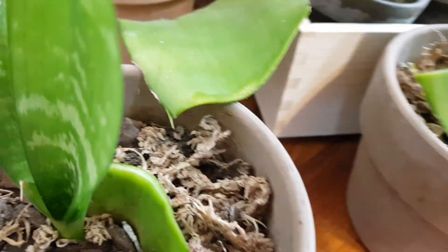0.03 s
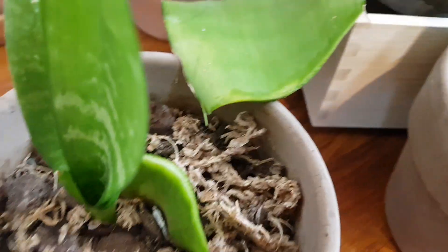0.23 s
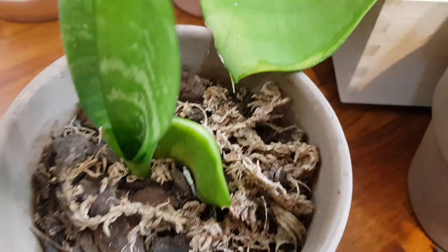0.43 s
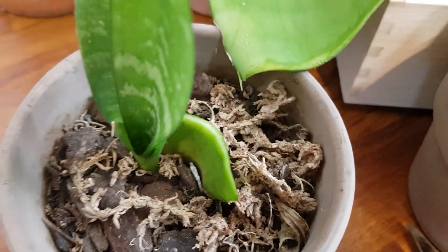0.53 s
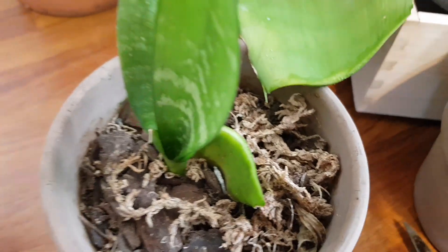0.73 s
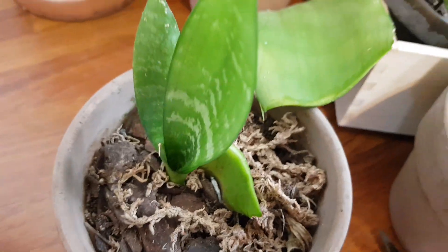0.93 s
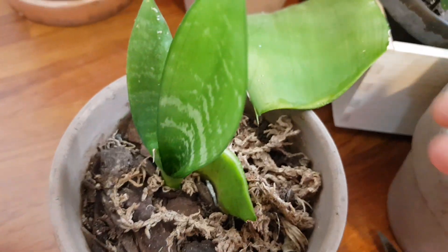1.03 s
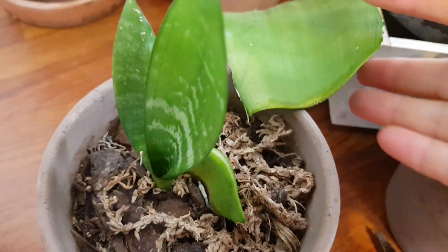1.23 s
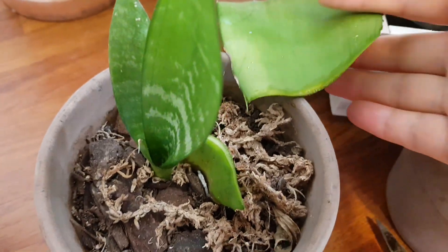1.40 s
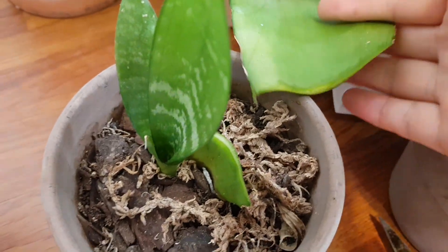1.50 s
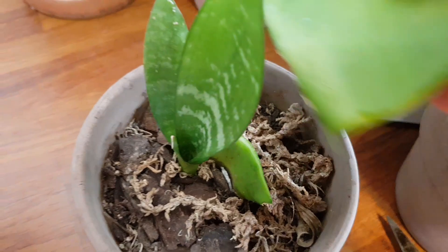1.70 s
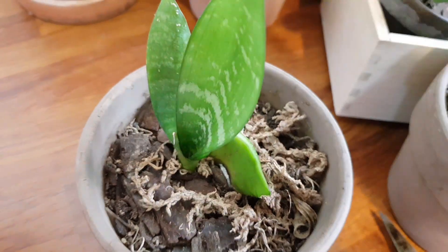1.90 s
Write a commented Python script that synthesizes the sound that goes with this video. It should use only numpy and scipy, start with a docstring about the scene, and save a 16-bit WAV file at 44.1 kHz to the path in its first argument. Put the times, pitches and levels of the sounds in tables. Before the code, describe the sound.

Close up, a clay pot slides on wood in two short, gritty, squeaking scrapes, ending in a bright clatter against a neighbouring pot. Later a finger softly brushes a leaf, over a small room's low appliance hum.

```python
"""Over a low appliance hum, a clay plant pot jolts and scrapes across a wooden table in a small room.
Sand catches under its foot, which sticks and slips in a hoarse squeak and a lower groan.
The pot rocks and knocks against its neighbour: each hit thumps the table and makes the clay ring.
Then a finger softly taps a leaf and slides along it."""
import sys
import numpy as np
from scipy import signal
from scipy.fft import rfft, irfft, next_fast_len
from scipy.io import wavfile
from scipy.ndimage import uniform_filter1d, map_coordinates

SR = 44100
rng = np.random.default_rng(int(sys.argv[2]) if len(sys.argv) > 2 else 0)


def dump(signal):
    """Clip the signal to [-1, 1] and save it as 16-bit WAV at the path in sys.argv[1]."""
    limited = np.clip(np.atleast_2d(signal).T, -1, 1)
    pcm = np.round(limited * 32767).astype(np.int16)
    wavfile.write(sys.argv[1], SR, pcm)


N = 85995
TIME_S = np.arange(N) / SR


def amp(db):
    """Turn decibels into a gain to multiply by."""
    return 10 ** (np.asarray(db) / 20)


def unit(x):
    """Scale a signal to an average (rms) level of 1."""
    return x / np.sqrt(np.mean(x ** 2) + 1e-20)


def along(points, hz):
    """Read between (frequency_hz, value) points on a log frequency axis."""
    points_hz, values = np.transpose(points)
    return np.interp(np.log(hz + 1), np.log(points_hz + 1), values)


def level(points):
    """A gain for each sample from (time_s, level_db) points, silent outside them."""
    return amp(np.interp(TIME_S, *np.transpose(points), left=-150, right=-150))


def wobble(rate_hz):
    """A smooth curve through rate_hz random values a second."""
    return map_coordinates(rng.standard_normal(2048), [TIME_S * rate_hz], mode="wrap")


def fade(t, decay_s, attack_s=.0002):
    """A sharp start that dies away by 60 dB in decay_s."""
    return np.exp(-np.log(1000) * t / decay_s) * (1 - np.exp(-t / attack_s))


def filtered(x, response):
    """Give each frequency in x the gain that response sets for it."""
    size = next_fast_len(N + SR // 4)
    return irfft(rfft(x, size) * response(np.fft.rfftfreq(size, 1 / SR)), size)[..., :N]


def colour(points):
    """A filter shape through (frequency_hz, level_db) points."""
    return lambda f: amp(along(points, f))


def resonances(rows):
    """A filter shape with a steep peak for each (pitch_hz, width_hz, level_db) row."""
    return lambda f: sum(amp(db) * np.abs(f * width / (hz * hz - f * f + 1j * f * width)) ** 2
                         for hz, width, db in rows)


# How alike left and right are (1 = the same): frequency_hz, likeness
STEREO_LIKENESS = [(90, 0.96), (250, .85), (600, 0.52), (1500, 0.05)]
def noise(response, lag_ms=0):
    """Filtered stereo noise at level 1, nearly mono in the bass; the left side is lag_ms late."""
    def split(f):
        angle = np.arccos(np.clip(along(STEREO_LIKENESS, f), -1, 1)) / 2
        return response(f) * np.array([np.cos(angle), np.sin(angle)])
    mid, side = filtered(rng.standard_normal((2, N)), split)
    left = np.roll(mid + side, int(lag_ms * SR / 1000))
    return unit(np.array([left, mid - side]))


# The motor's tones: multiple of its pitch, level_db
HUM_TONES = [(3, -66), (5, -57), (6, -62), (8, -72), (10, -77.5)]
# The colour of the room's rumble: frequency_hz, level_db
RUMBLE_COLOUR = [(25, -10.5), (42, -10), (150, -7.5), (400, -19.5), (650, -28), (1200, -40.5), (3200, -48),
                 (5800, -43), (8000, -50), (12000, -44)]
def background(hum_hz=59.1, waver_hz=.18, whine_hz=9150):
    """An appliance motor's wavering hum, with room rumble and a faint high whine."""
    phase = 2 * np.pi * np.cumsum(hum_hz + waver_hz * wobble(25)) / SR
    hum = np.sqrt(2) * sum(amp(db) * np.sin(multiple * phase + rng.uniform(0, 2 * np.pi))
                           for multiple, db in HUM_TONES)
    whine = noise(lambda f: np.exp(-((f - whine_hz) / 110) ** 2))
    rumble = noise(colour(RUMBLE_COLOUR))
    return hum + amp(-55) * rumble + amp(-85.5) * whine


# How long the echo's tail lasts: frequency_hz, decay_s
ECHO_DECAY = [(100, 0.37), (2000, .41), (6500, 0.19), (14000, 0.18)]
# The echo's strength next to the direct sound: frequency_hz, level_db
ECHO_COLOUR = [(100, -11), (2000, -17.5), (14000, -14.5)]
def room_echo(x, build_s=.0033, early_s=.31, early_db=8):
    """The nearest walls answer with a quick wash, over a light tail that dies faster in the treble."""
    hz, t, spectrum = signal.stft(noise(np.ones_like)[:, :SR // 2], SR, nperseg=256)
    decay = fade(t, along(ECHO_DECAY, hz)[:, None]) + amp(early_db) * fade(t, early_s)
    build_up = 1 - np.exp(-t / build_s)
    click_echo = signal.istft(spectrum * decay * build_up, SR, nperseg=256)[1]
    echo = signal.fftconvolve(x, click_echo / np.linalg.norm(click_echo[0]), axes=1)[:, :N]
    return filtered(echo, colour(ECHO_COLOUR))


# The finger lands: start_s, level_db
LEAF_TAPS = [(1.5112, -52)]
# The finger slides: time_s, level_db
LEAF_STROKE = [(1.52, -87), (1.62, -70), (1.672, -62.5), (1.686, -57), (1.715, -58), (1.765, -55.5),
               (1.803, -52.5), (1.82, -76)]
# The leaf resonates under the finger: peak_s, pitch_hz, level_db
LEAF_SCUFFS = [(1.69, 10030, -57), (1.726, 717, -58), (1.775, 12400, -59), (1.783, 1990, -60.5)]
# The colours of the tap and the stroke: frequency_hz, level_db
TAP_COLOUR = [(1100, 12.5), (2000, -5), (7000, -8.5), (15000, -45)]
STROKE_COLOUR = [(800, 6.5), (1400, -2), (2600, -1.5), (3700, -13), (5100, -1.5), (6000, -5), (10500, 0.5),
                 (15400, 1)]
def finger_on_leaf(tap_s=.16, scuff_s=.027, catch_db=2):
    """A fingertip lands on the stiff leaf, then slides off along it in tiny catches."""
    tap_level = sum(amp(db) * fade(np.maximum(TIME_S - start_s, 0), tap_s) for start_s, db in LEAF_TAPS)
    tap = tap_level * noise(colour(TAP_COLOUR))
    scuffs = np.zeros((2, N))
    for peak_s, hz, db in LEAF_SCUFFS:
        swell = amp(db) * np.exp(-((TIME_S - peak_s) / scuff_s) ** 2)
        scuffs += swell * noise(resonances([(hz, hz / 2.8, 0)]))
    catches = unit(amp(catch_db * wobble(rate_hz=900)))
    stroke = level(LEAF_STROKE) * noise(colour(STROKE_COLOUR)) * amp([[2], [-2]])  # louder on the left
    return tap + catches * (scuffs + stroke)


# The foot's high chatter and the pot's low judder: time_s, pitch_hz, level_db
FOOT_SQUEAK = [(0.239, 750, -38.5), (.32, 805, -39.5), (0.408, 828, -58.5), (.47, 860, -45),
               (.53, 750, -39), (.62, 733, -40)]
POT_GROAN = [(.26, 332.5, -47.5), (.44, 295.2, -42), (.66, 347, -45)]
def stick_slip(rows, jitter_hz, rough_db):
    """The pot sticks and slips so fast that it makes a hoarse, wandering tone."""
    times_s, hz, db = np.transpose(rows)
    pitch_hz = np.interp(TIME_S, times_s, hz) + jitter_hz * wobble(250)
    loudness = uniform_filter1d(level(np.transpose([times_s, db])), size=400)
    roughness = amp(rough_db * wobble(120))
    tone = loudness * unit(roughness * np.sin(2 * np.pi * np.cumsum(pitch_hz) / SR))
    return np.array([np.roll(tone, 12), tone])  # the left side is 12 samples late


# How each of the two slides swells and fades: time_s, level_db
FIRST_SLIDE = [(.25, -48.5), (.285, -39.5), (.322, -36), (.352, -39), (.39, -52.5), (.45, -51.5),
               (.49, -47)]
SECOND_SLIDE = [(.48, -57.5), (.5, -27.5), (.535, -33.5), (.565, -34.5), (.61, -33.5), (.68, -45)]
# The pot's resonances in each slide: pitch_hz, width_hz, level_db
FIRST_RUB = [(314.5, 150, -7), (810, 110, -6), (1480, 160, -11.5), (1743, 75, 2.5), (2120, 110, -4),
             (2550, 270, -13)]
SECOND_RUB = [(234, 110, -2), (488, 90, -2), (758, 97, -6), (1020, 660, -14.5), (1760, 110, -16.5)]
# The colour of the sand's hiss: frequency_hz, level_db
SAND_COLOUR = [(1000, -3), (2600, 1.5), (5000, -5.5), (8000, -14.5), (11500, -10), (15500, -21.5)]
def scrape(slide, rub, sand_db, rough_db, wander=.008):
    """Sand catches and slips under the foot; the pot's resonances wander as the contact point shifts."""
    slips = unit(amp(rough_db * wobble(220)))
    clock = np.arange(N) + np.cumsum(wander * wobble(40))  # an uneven speed bends the pitch
    steady = noise(resonances(rub), lag_ms=.36)
    body = np.array([map_coordinates(side, [clock], mode="reflect") for side in steady])
    sand = amp(sand_db) * slips * noise(colour(SAND_COLOUR))
    return level(slide) * (body + sand)


def clay_ring(tones, t, scatter_db=1.5):
    """The clay's own tones, damped by the soil and a little louder or softer at each hit."""
    return sum((-1) ** (k + 1) * amp(db - scatter_db * rng.standard_normal())
               * fade(t, decay_s) * np.sin(2 * np.pi * hz * t)
               for k, (hz, db, decay_s) in enumerate(tones))


# The colour of crushed grit: frequency_hz, level_db
GRIT_COLOUR = [(800, -14.5), (3000, -0.5), (8000, -3), (12000, -5), (15500, -11)]
def hits(rows, tones, clack_colour, clack_s, ring_gain_db, left_db, lag_ms, thud_hz=90, ping_cycles=13):
    """Each hit thumps the table, rings the clay, pings the struck spot and crushes grit."""
    out = np.zeros((2, N))
    clack_noise = noise(colour(clack_colour), lag_ms)
    grit_noise = noise(colour(GRIT_COLOUR), lag_ms)
    delay_s = np.array([[lag_ms / 1000], [0]])  # the sound reaches the left side later
    for start_s, thud_db, ring_db, clack_db, grit_db, ping_hz in rows:
        span = int(start_s * SR) + np.arange(SR // 3)
        t = np.maximum(span / SR - start_s - delay_s, 0)
        # The table top gives once and hardly rings.
        thud = -amp(thud_db) * fade(t, decay_s=.031) * np.cos(2 * np.pi * thud_hz * t)
        ring = amp(ring_db + ring_gain_db) * clay_ring(tones, t)
        # A ping lasts a set number of cycles, so a high one is just a crack.
        ping = amp(7.5) * fade(t, ping_cycles / ping_hz) * np.sin(2 * np.pi * ping_hz * t)
        rattle = amp(-15.5) * fade(t, decay_s=.13)
        clack = amp(clack_db) * (ping + clack_noise[:, span] * (fade(t, clack_s) + rattle))
        grit = amp(grit_db) * grit_noise[:, span] * (fade(t, decay_s=.011) + rattle / 2)
        out[:, span] += thud + ring + clack + grit
    return out * amp([[left_db / 2], [-left_db / 2]])


# The foot hits the table: start_s, thud_db, ring_db, clack_db, grit_db, ping_hz
FOOT_HITS = [(.2388, -24.5, -23, -23, -23, 2107), (.2500, -31, -29, -29.5, -34.5, 776),
             (.3612, -31.5, -26, -48.5, -54, 720), (.4770, -38.5, -36.5, -22, -30, 1060),
             (.4850, -33.5, -30.5, -25.5, -26.5, 1084), (.4893, -24.5, -15.5, -20, -18, 1082),
             (.6187, -24, -15, -22.5, -44, 667)]
# The pot's ringing tones: pitch_hz, level_db, decay_s
POT_TONES = [(218, -4.5, 0.07), (265, -6, .1), (355, -6.5, 0.14), (500.7, -2, 0.081), (638, -10.5, 0.087),
             (753.6, 2, .06), (1790, -11, .08)]
# The colour of the foot's clack: frequency_hz, level_db
FOOT_COLOUR = [(100, -17.5), (300, 2), (1000, 0), (2200, -8), (15000, -48)]
def jolts():
    """The pushed pot jolts and rocks, striking the wood with its foot."""
    return hits(FOOT_HITS, POT_TONES, FOOT_COLOUR,
                clack_s=.024, ring_gain_db=-1.5, left_db=.75, lag_ms=.25)


# Pot hits pot: start_s, thud_db, ring_db, clack_db, grit_db, ping_hz
RIM_HITS = [(.6267, -14.5, -16.5, -7, -11, 3140), (.6302, -25.5, -12.5, -20.5, -29, 780),
            (.6335, -38, -28, -19, -38.5, 1648), (.6378, -31, -33, -35.5, -26.5, 1300),
            (.6645, -36, -20, -25.5, -55.5, 1400)]
# The neighbour's ringing tones: pitch_hz, level_db, decay_s
NEIGHBOUR_TONES = [(244, -4.5, 0.11), (368.2, -3, 0.16), (493.9, 7, .11), (657, -5.5, .09), (728.7, 1, .09),
                   (784, -5, 0.19), (980, -8.5, 0.04), (1210, -10.5, 0.045), (1297, -3, 0.15),
                   (1634, -0.5, 0.11), (2185, -9, .06), (2900, -13, .04)]
# The colour of the rim's clack: frequency_hz, level_db
RIM_COLOUR = [(100, -31.5), (400, -2.5), (1600, 3.5), (2300, -2), (3200, -4), (3900, -14.5), (15000, -38.5)]
def knocks():
    """The pot strikes its neighbour in a quick, bright clatter."""
    return hits(RIM_HITS, NEIGHBOUR_TONES, RIM_COLOUR,
                clack_s=.022, ring_gain_db=-12, left_db=.54, lag_ms=.11)


def scene():
    """Pot and leaf close by, in a small room with a steady hum."""
    near = jolts() + knocks()
    near += scrape(FIRST_SLIDE, FIRST_RUB, sand_db=-7.5, rough_db=2)
    near += scrape(SECOND_SLIDE, SECOND_RUB, sand_db=-18.5, rough_db=3.5)
    near += stick_slip(FOOT_SQUEAK, jitter_hz=28, rough_db=4.5)
    near += stick_slip(POT_GROAN, jitter_hz=37.94, rough_db=3)
    near += finger_on_leaf()
    return near + room_echo(near) + background()


def record(dry):
    """Round off the highest peaks and cut away the very top of the treble."""
    ceiling, top_hz = .88, 15650
    rounded = dry / (1 + (dry / ceiling) ** 6) ** (1 / 6)
    return filtered(rounded, lambda f: np.clip((top_hz - f) / 500 + .5, 0, 1))


dry = scene()
out = record(dry)
dump(out)
```